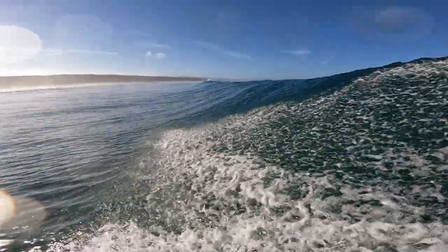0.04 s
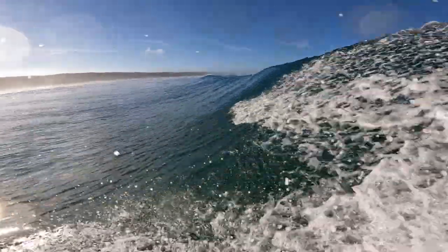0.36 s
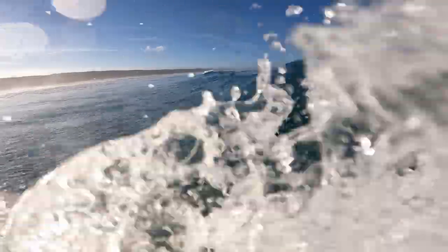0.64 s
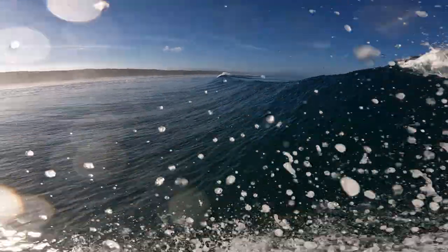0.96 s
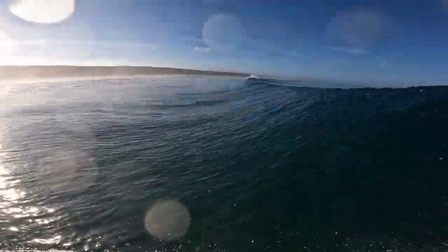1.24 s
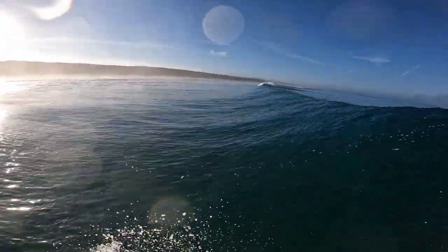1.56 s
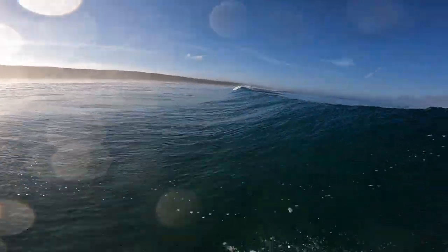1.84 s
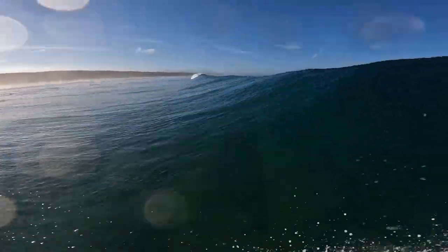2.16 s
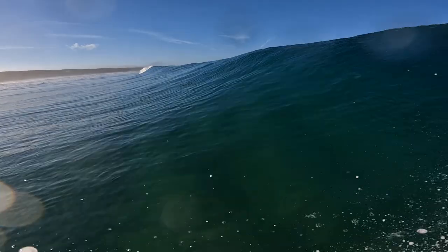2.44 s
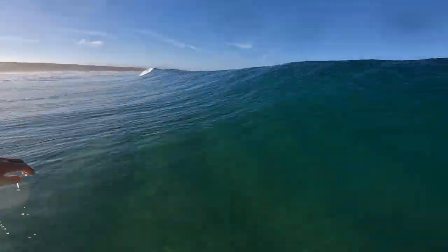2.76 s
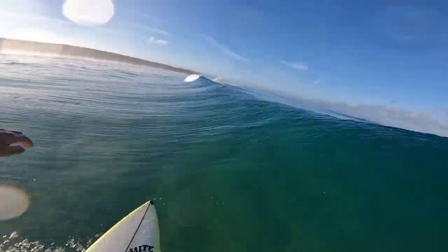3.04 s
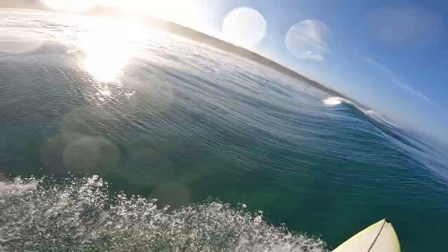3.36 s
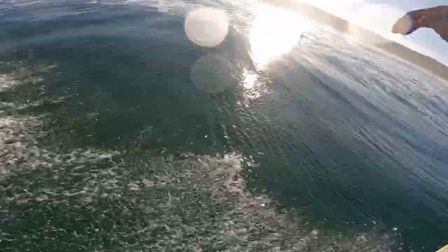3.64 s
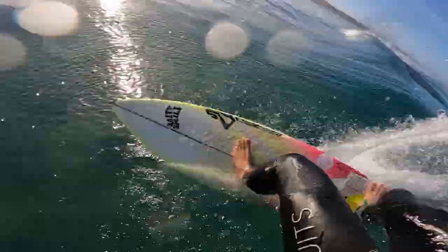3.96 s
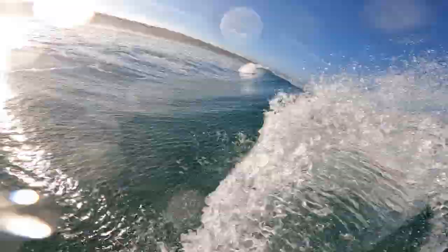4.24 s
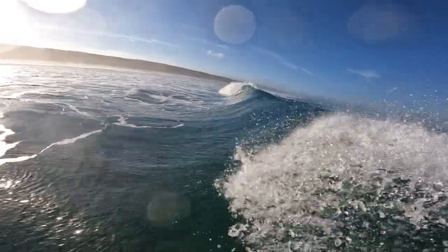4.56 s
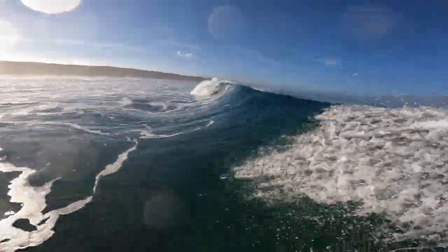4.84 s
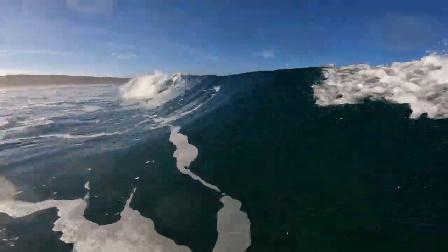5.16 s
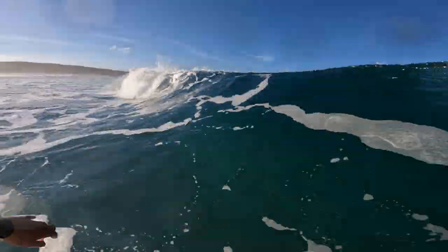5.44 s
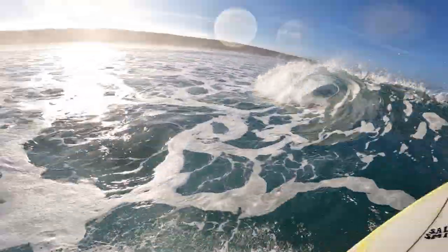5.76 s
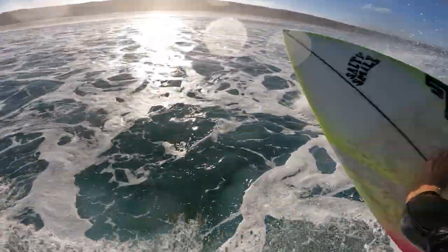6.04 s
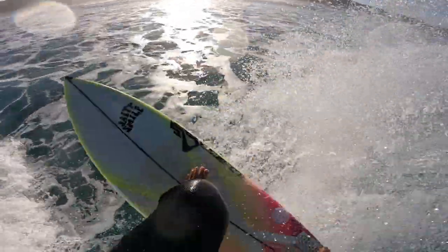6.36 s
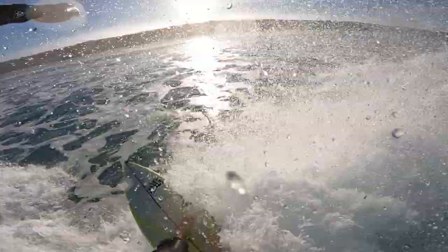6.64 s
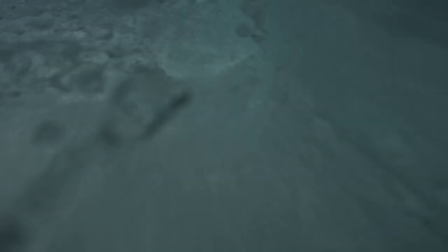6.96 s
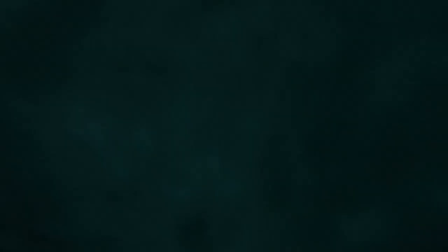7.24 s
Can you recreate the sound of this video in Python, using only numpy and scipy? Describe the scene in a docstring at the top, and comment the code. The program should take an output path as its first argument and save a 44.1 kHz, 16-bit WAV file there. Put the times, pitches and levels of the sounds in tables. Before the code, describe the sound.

A continuous close roar of churning water and buffeting wind comes through the sealed housing of a camera riding an ocean wave. Spray fizzes on and off, splashes tap and knock against the case, and water momentarily muffles the microphone about halfway through. The ride ends in a hollow slap of foam, followed by the deep glugs and bubbling crackle of going underwater.

```python
"""A surfer rides a wave with a waterproof camera. From the start, turbulent wind buffets the housing and
excites the cavities of its microphone port, while water churns under the board and spray hisses.
From half a second on, drops strike the housing; later, films of water briefly seal the port.
Near seven seconds white water slaps the housing with a hollow, comb-like ring, and the camera plunges
under, into the gulps of large air pockets and the crackle of small bubbles."""
import sys
import numpy as np
from scipy.fft import rfft, irfft, next_fast_len
from scipy.io import wavfile
from scipy.ndimage import map_coordinates

SR = 44100
rng = np.random.default_rng(int(sys.argv[2]) if len(sys.argv) > 2 else 0)


def wav_record(signal):
    """Record a signal, one row per channel, as 16-bit PCM in the file named by sys.argv[1]."""
    frames = np.transpose(np.atleast_2d(signal))
    bounded = np.clip(frames, -1, 1)
    # unit amplitude maps onto the largest positive 16-bit level
    quanta = np.round(bounded * 32767).astype(np.int16)
    wavfile.write(sys.argv[1], SR, quanta)


N = 330750

# speed of the air over the port, expressed as a level: (time [s], relative level [dB])
AIRFLOW = [(0, -42.5), (.32, -41), (.42, -39), (.55, -39.5), (.64, -44), (.96, -44), (1.04, -39),
           (1.2, -42.5), (1.5, -45), (1.8, -42), (2.05, -42.5), (2.35, -41.5), (2.5, -42), (2.63, -38),
           (2.77, -46.5), (2.9, -40.5), (3.03, -43), (3.25, -50.5), (3.46, -58.5), (3.58, -52.5),
           (3.8, -46), (4.2, -49), (4.32, -39), (4.38, -46.5), (4.44, -43), (4.49, -45.5), (4.58, -40.5),
           (4.8, -43.5), (5.3, -40.5), (5.55, -46), (5.76, -41), (5.9, -54), (6.05, -48), (6.33, -52),
           (6.52, -52), (6.85, -49), (7.5, -46)]
# surges and lulls of pressure on the housing: (time [s], length [s], change [dB])
SURGES = [(.54, 0.051, 5), (.75, .25, 0), (1.68, 0.059, 1.5), (2.2, .2, 1), (2.9, 0.057, 4), (3.6, .2, 0),
          (3.87, 0.11, -4.5), (4.15, 0.2, 3.5), (4.72, .26, -1.5), (5.6, .12, 3), (6.1, 0.36, -3),
          (6.9, 0.26, 3), (7.09, 0.11, 3), (7.27, 0.07, -5.5)]
# air cavities of the port: (frequency [Hz], bandwidth [Hz], gain [dB])
PORT_MODES = [(660.7, 160, 3), (674, 110, -7)]
# the port's pitch, which sinks as it gets wet: (time [s], frequency [Hz])
PORT_PITCH = [(0, 668), (.5, 652), (.69, 527.4), (.8, 703.4), (1.15, 664), (1.4, 509.4), (1.85, 628.4),
              (2.3, 676), (2.9, 624), (3.4, 520), (3.9, 623), (4.4, 594), (4.65, 688.7), (5.35, 649.2),
              (6, 541.7), (7.5, 556.2)]
# gusts that catch the port squarely: (time [s], length [s], rise [dB])
HOWLS = [(.1, 0.32, 3), (.81, 0.1, 5), (.97, .12, 2), (1.17, 0.14, 5.5), (1.45, 0.31, 7.5), (1.85, .2, 2.5),
         (2.25, 0.57, 5.5), (3.28, .2, 1.5), (4.68, .25, 5), (5.38, .2, 2.5), (6.2, .2, 4.5),
         (6.66, .1, 12), (6.92, 0.071, 12), (7.1, 0.055, 11)]
# how hard the board and the white water churn: (time [s], level [dB])
CHURN_LEVEL = [(0, -26), (.2, -30.5), (.5, -27), (1.1, -31), (1.5, -28), (1.95, -31), (2.45, -33),
               (2.72, -25.5), (2.95, -29.5), (3.3, -27), (3.5, -29), (3.9, -25), (4.2, -27.5), (4.5, -25),
               (4.62, -31.5), (5.2, -33), (5.52, -25.5), (5.72, -29), (5.95, -25.5), (6.15, -25.5),
               (6.3, -23.5), (6.47, -24), (6.6, -23), (6.84, -25), (6.95, -23), (7.5, -28)]
# spray and foam beside the board: (time [s], level [dB])
SPRAY_LEVEL = [(.25, -73), (.53, -64), (.63, -75), (.8, -71.5), (.98, -71), (1.03, -59.5), (1.12, -64.5),
               (1.45, -75.5), (1.8, -69), (2.5, -68), (2.78, -81.5), (3.28, -77), (3.55, -66.5),
               (3.92, -65.5), (4.2, -72.5), (4.33, -74), (4.5, -68.5), (4.88, -61), (5.3, -64.5),
               (5.7, -73.5), (6.05, -68), (6.32, -73), (6.45, -67), (6.53, -71), (6.61, -66), (6.8, -70),
               (7.3, -72)]
# sheets of fine droplets that sweep the housing; the two brief rows near 6.9 s are bright cracks of the
# plunge's impacts: (time [s], length [s], level [dB])
SHEETS = [(0.295, 0.84, -80.5), (0.786, 0.05, -68.5), (1.037, 0.08, -63.5), (2.252, 0.8, -76),
          (2.618, 0.077, -73.5), (3.097, 0.44, -79.5), (3.528, 0.16, -69), (3.696, 0.27, -73.5),
          (4.109, .05, -68), (5.998, 0.57, -72.5), (6.48, 0.12, -76), (6.71, 0.04, -66), (6.9, 0.042, -49),
          (6.933, 0.0095, -43.5), (7.095, 0.06, -67)]
# lumps of water and bubbles striking the housing:
# (time [s], knock pitch [Hz], knock level [dB], tick pitch [Hz], tick level [dB], crack level [dB])
DROPS = [(.5370, 1160, -27, 1900, -43, -53), (0.7594, 850, -32, 2150, -35.5, -43),
         (.7855, 714, -22, 2200, -42.5, -53.5), (0.8602, 1020, -21, 1850, -35, -60),
         (1.023, 910, -27, 1900, -38, -56), (1.385, 929.8, -24.5, 1808, -48, -61),
         (3.9600, 950, -19, 3400, -34.5, -44), (3.9618, 447, -19, 1400, -36, -60),
         (4.0410, 900, -26, 3270, -47, -57), (4.1210, 596, -13, 2960, -34.5, -45),
         (4.1240, 700, -20.5, 1500, -38.5, -60), (4.1935, 684.3, -16, 1650, -37.5, -66),
         (6.587, 744, -28, 2120, -50.5, -64.5), (6.7030, 1095, -23, 2300, -48, -53),
         (6.7900, 1100, -30, 1903, -50, -65), (6.8470, 1100, -30, 2000, -46, -57),
         (6.8590, 995, -23, 2100, -43, -52), (6.8752, 1050, -31, 2100, -42, -52),
         (6.8928, 940, -18, 3196, -33, -35.5), (6.8975, 1350, -27, 2600, -28, -24.5),
         (6.9010, 950, -15.5, 1700, -24.5, -39.5), (6.9081, 450, -17, 1500, -42, -58),
         (6.9168, 1000, -21, 1850, -34, -40), (6.9297, 1250, -23, 3300, -33, -35),
         (6.9320, 905, -25, 2000, -34, -39), (6.9355, 560, -21, 2500, -36, -43),
         (6.9435, 519, -18, 2450, -41, -52), (6.9770, 470, -15.5, 2700, -49, -51),
         (7.0057, 650, -17.5, 2300, -49, -53), (7.0135, 900, -30, 2600, -52, -54),
         (7.0210, 750, -25, 2000, -48, -57), (7.041, 800, -27, 3300, -61, -55),
         (7.1, 790, -29, 2600, -51, -54), (7.1060, 614, -24, 2000, -42, -47),
         (7.1160, 600.6, -22, 1903, -42, -48.5), (7.1250, 800, -25, 2800, -48, -44.5),
         (7.1288, 990, -20.5, 2200, -43, -43), (7.1490, 900, -34, 2700, -52, -51.5),
         (7.1650, 850, -33.5, 2400, -50.5, -55), (7.1740, 750, -31, 2378, -52.5, -52),
         (7.1796, 535, -17, 2400, -56, -54), (7.3260, 1000, -28.5, 2500, -45.5, -49),
         (7.339, 1201, -31, 2004, -45, -51), (7.3550, 1295, -36, 2990, -52, -48),
         (7.3690, 1000, -34, 2480, -51, -54), (7.3820, 950, -38, 2200, -46, -53),
         (7.4050, 1100, -32, 2400, -43, -48), (7.4190, 1000, -28, 2703, -46, -51),
         (7.4330, 1040, -25, 2100, -40, -49), (7.4420, 980, -27, 3000, -49, -52.5),
         (7.4560, 1200, -32, 2200, -42, -49), (7.4797, 1210, -37, 2600, -49, -54.5)]
# tiny beads of spray landing on the port: (time [s], level [dB])
BEADS = [(0.7768, -63), (0.8092, -66.5), (0.991, -66), (1.9731, -71), (2.3003, -70), (3.6237, -69.5),
         (4.236, -73), (4.3240, -68), (5.8940, -70.5), (6.6925, -66.5), (7.0790, -64)]
# large air pockets collapsing near the camera: (time [s], length [s], pitch [Hz], level [dB])
GULPS = [(.792, .03, 725, -27.5), (.822, .026, 665, -25.5), (6.897, 0.061, 54.2, -23.5),
         (6.903, 0.052, 228, -24), (6.94, 0.022, 127, -20.5), (6.979, .05, 292.7, -27),
         (7.052, .03, 163.4, -23.5), (7.096, 0.054, 77.2, -20.5), (7.102, 0.043, 221, -26),
         (7.112, .035, 510, -24.5), (7.171, 0.055, 109.1, -20.5)]
# water films over the port: (time [s], length [s], treble loss [dB], bass loss [dB])
FILMS = [(2.777, 0.031, 6, 1), (4.001, 0.065, 13, 6.5), (4.159, 0.03, 9, 1.5), (4.214, 0.021, 2.5, 4),
         (7.152, 0.028, 7.5, 13.5), (7.244, 0.12, 9.5, -1)]
# foam clouds bursting on the housing: (time [s], hold [s], relative level [dB])
FOAM_CLOUDS = [(6.702, 0.014, -53), (6.847, 0.031, -47), (6.89, 0.039, -42), (6.972, .02, -56),
               (7.003, 0.018, -56), (7.06, 0.035, -61), (7.108, 0.027, -48), (7.334, 0.08, -51.5),
               (7.403, 0.044, -48), (7.492, .02, -47)]
# white water slaps the housing with a hollow, comb-like ring:
# (time [s], length [s], lowest peak [Hz], level [dB], relative port ring [dB])
SLAPS = [(6.888, 0.032, 1140, -33, -16), (6.945, 0.029, 1470, -36.5, -18)]
# evenly spaced peaks in a slap's hollow ring, lowest first: (relative level [dB])
HOLLOW_PEAK_DB = [4.5, -6, -30, -24.5, -29, -33]

# noise spectra: (frequency [Hz], relative spectral density [dB])
BUFFET_SPECTRUM = [(10, -10.5), (25, -1.5), (50, -2.5), (80, 0.5), (105, -4.5), (140, -2.5), (190, -15.5),
                   (400, -42), (900, -91)]  # eddies on the housing
RUSH_SPECTRUM = [(150, -12.5), (350, 2), (550, 9), (840, 4.5), (950, -1), (1110, -0.5), (1400, -10.5),
                 (1800, -19), (2300, -28), (2700, -34), (3500, -42.5), (5000, -57), (9000, -92)]  # air over the port
CHURN_SPECTRUM = [(60, -24), (130, -4.5), (180, 0.5), (300, 0.5), (460, -1.5), (600, -9), (800, -14.5),
                  (1100, -37), (2000, -63), (5000, -100)]  # water under the board
HISS_SPECTRUM = [(600, -17.5), (1500, 7.5), (2300, 10.5), (2680, 0.5), (2950, 8), (3450, -0.5), (4100, -10),
                 (5200, -14), (6500, -26), (8000, -32), (11000, -59.5)]  # spray and foam
MIST_SPECTRUM = [(800, -18.5), (1800, 4.5), (3500, 0.5), (4300, -4.5), (5500, -6.5), (6500, -13),
                 (7500, -20.5), (10000, -50)]  # fine droplets
CRACK_SPECTRUM = [(500, -5.5), (2000, 8), (3600, -5), (4600, -11), (6000, -19), (8000, -29), (11000, -41)]  # a wet impact
BEAD_SPECTRUM = [(1500, -6), (3500, 0.5), (5800, 0), (7500, -9), (11000, -15.5)]  # a bead's tick


def amp(db):
    """Amplitude ratio of a level in decibels."""
    return 10 ** (np.asarray(db) / 20)


def unit(x):
    """Normalisation to rms 1."""
    return x / np.sqrt(np.mean(x ** 2) + 1e-20)


def curve(rows):
    """Linear interpolation of (time [s], value) points at every sample."""
    return np.interp(np.arange(N) / SR, *np.transpose(rows))


def wobble(rate):
    """Smooth random modulation with rate knots a second."""
    knots = rng.standard_normal(int(N * rate / SR) + 4)
    return map_coordinates(knots, [np.arange(N) * rate / SR])


def swells(rows):
    """Superposed Gaussian envelopes from (time [s], length [s], height)."""
    t = np.arange(N) / SR
    return sum(height * np.exp(-(2 * (t - s) / length) ** 2) for s, length, height in rows)


def plateau(s, length):
    """A flat-topped window centred on time s."""
    offset = 2 * (np.arange(N) / SR - s) / length
    return 1 / (1 + offset ** 8)


def filtered(x, response):
    """Linear filtering: the spectrum of x times a frequency response."""
    size = next_fast_len(N + SR // 2)
    return irfft(rfft(x, size) * response(np.fft.rfftfreq(size, 1 / SR)), size)[:N]


def lowpass(x, cutoff_hz, order):
    """Zero-phase attenuation above the cutoff."""
    return filtered(x, lambda hz: 1 / (1 + (hz / cutoff_hz) ** order))


def noise(spectrum):
    """Noise of rms 1, shaped by a spectrum interpolated in log frequency."""
    f, db = np.transpose(spectrum)
    colour = lambda hz: amp(np.interp(np.log(hz + 1), np.log(f), db))
    return unit(filtered(rng.standard_normal(N), colour))


def bubbles(start, rate, centre_hz, octaves, cycles, scatter_db, slope_db, rise):
    """Bubbles as damped oscillators, rms 1 from start on: small ones ring higher, shorter and weaker."""
    draws = rng.random((int(rate * (N / SR - start)), 4))
    when, pitch, strength, life = draws.T[:, :, None]
    octave = octaves * (2 * pitch - 1)
    hz = centre_hz * 2 ** octave
    t = np.arange(min(int(3 * cycles / centre_hz * SR), 1500)) / SR
    age = hz * t / (cycles * (.5 + life))  # 1 after 60 dB of decay
    ring = np.sin(2 * np.pi * hz * t * (1 + rise * age))
    envelope = amp(-60 * age) * (1 - np.exp(-2 * hz * t)) * (1 - t / t[-1])
    grains = ring * envelope * amp(-scatter_db * np.log(strength + 0.01) + slope_db * octave)
    index = (start * SR + when * (N - start * SR)).astype(int) + np.arange(len(t))
    cloud = np.bincount(index.ravel(), grains.ravel(), N)[:N]
    return cloud / np.std(cloud[int(start * SR):])


def wind_buffet(air_db):
    """Eddies exert a fluctuating pressure on the housing, heard as a rumble."""
    gust_db = air_db - air_db.mean()
    return amp(-28 + .05 * gust_db + swells(SURGES)) * noise(BUFFET_SPECTRUM)


def wind_rush(air_db):
    """Turbulent flow over the port makes broadband noise that grows with air speed."""
    flutter_db = 1.2 * wobble(25) + 1.8 * wobble(130)
    return amp(air_db + 9 + flutter_db) * noise(RUSH_SPECTRUM)


def port_song(air_db, churn_db):
    """Cavity resonance: the port sings louder in fast air and is choked by churning water."""
    def response(f):
        modes = sum(amp(db) * 1j * f * width / (hz * hz - f * f + 1j * f * width)
                    for hz, width, db in PORT_MODES)
        return modes / (1 + (f / 860) ** 16) * f ** 2 / (f ** 2 + 350 ** 2)

    song = filtered(rng.standard_normal(N), response)
    # resampling makes both cavities glide and flutter together
    pitch_ratio = curve(PORT_PITCH) / PORT_MODES[0][0] * (1 + 0.01004 * wobble(9))
    song = unit(map_coordinates(song, [np.cumsum(pitch_ratio)], order=3, mode="mirror"))
    gust_db, wet_db = air_db - air_db.mean(), churn_db - churn_db.mean()
    song_db = -38.5 + 0.31 * gust_db - 0.25 * wet_db + swells(HOWLS) + 0.55 * wobble(15)
    return amp(song_db) * song


def churn(churn_db):
    """Turbulence under the board roars, and the large air pockets it entrains oscillate as gurgles."""
    gurgle = bubbles(0, rate=260, centre_hz=287.4, octaves=0.89, cycles=12,
                     scatter_db=1.5, slope_db=-2, rise=0.11)
    return amp(churn_db) * (amp(-2) * noise(CHURN_SPECTRUM) + amp(-6.5) * gurgle)


def spray():
    """Many tiny bubbles and droplets add incoherently into a hiss of foam and a fine mist."""
    fizz = bubbles(0, rate=2600, centre_hz=2960, octaves=0.63, cycles=4.5,
                   scatter_db=8, slope_db=-11.5, rise=.05)
    specks = bubbles(0, rate=700, centre_hz=4600, octaves=0.7, cycles=4,
                     scatter_db=6, slope_db=-9.5, rise=.03)
    mist = amp(-1) * noise(MIST_SPECTRUM) + amp(-12.5) * specks
    hiss = noise(HISS_SPECTRUM) + amp(-6.5) * fizz
    sheets = swells([(s, length, amp(db)) for s, length, db in SHEETS])
    mist_gain = np.hypot(sheets, amp(-80.5))  # passing sheets and steady mist add in power
    return amp(curve(SPRAY_LEVEL)) * hiss + mist_gain * mist


def patter(air_db):
    """Stray drops carried by the air stream ring briefly on impact, louder in faster air."""
    plops = bubbles(0, rate=70, centre_hz=1060, octaves=0.82, cycles=7.1,
                    scatter_db=-1, slope_db=-12.5, rise=0.044)
    return amp(air_db - 10) * lowpass(plops, 2200, order=6)


def drops():
    """Heavily damped impacts: each lump of water knocks on the wet wall, ticks on the port and cracks."""
    out, t = np.zeros(N + SR), np.arange(SR // 50) / SR
    pulse = lambda peak_s: (t / peak_s) ** 2 * np.exp(2 - 2 * t / peak_s)
    grit = noise(CRACK_SPECTRUM)
    for s, knock_hz, knock_db, tick_hz, tick_db, crack_db in DROPS:
        start = round(s * SR)
        knock = amp(knock_db) * pulse(0.00095) * np.sin(2 * np.pi * knock_hz * t)
        tick = amp(tick_db) * pulse(0.00069) * np.sin(2 * np.pi * tick_hz * t)
        crack = amp(crack_db) * pulse(0.0009) * grit[start:][:len(t)]
        out[start:][:len(t)] += knock + tick + crack
    return out[:N]


def beads(peak_s=.0008):
    """A brief impact has a broad spectrum: beads of spray land on the port with a thin, faint tick."""
    t = np.arange(N) / SR
    ages = [(np.clip((t - s) / peak_s, 0, 20), db) for s, db in BEADS]
    envelope = sum(amp(db) * age * np.exp(1 - age) for age, db in ages)
    return envelope * noise(BEAD_SPECTRUM)


def gulps(rise_octaves_per_s=2):
    """A large air pocket pulsates at its natural frequency, which rises as the pocket shrinks."""
    out = np.zeros(N)
    for s, length, hz, db in GULPS:
        t = np.arange(-int(2 * length * SR), int(2 * length * SR)) / SR
        pitch_hz = hz * 2 ** (rise_octaves_per_s * t)
        phase = 2 * np.pi * (np.cumsum(pitch_hz) / SR + rng.random())
        envelope = amp(db) * np.exp(-(2 * t / length) ** 2)
        out[round((s + t[0]) * SR):][:len(t)] += envelope * np.sin(phase)
    return out


def water_films(x):
    """Transmission loss: a film of water briefly seals the port, changing bass and treble unequally."""
    treble_loss_db, bass_loss_db = sum(np.outer(loss_db, plateau(s, length))
                                       for s, length, *loss_db in FILMS)
    bass = lowpass(x, 650, order=6)
    return amp(-bass_loss_db) * bass + amp(-treble_loss_db) * (x - bass)


def foam(rise_db_per_s=1498.5, fall_db_per_s=702.5):
    """Bubble resonance: as white water closes over the camera, clouds of foam swell, crackle and die."""
    t = np.arange(N) / SR
    envelope = np.zeros(N)
    for s, hold, db in FOAM_CLOUDS:
        before_s, after_s = np.clip(s - t, 0, .1), np.clip(t - s - hold, 0, .1)
        envelope += amp(db - rise_db_per_s * before_s - fall_db_per_s * after_s)
    crackle = bubbles(6.6, rate=1200, centre_hz=1920, octaves=1.65, cycles=3.7,
                      scatter_db=4, slope_db=-15.5, rise=.1)
    fizz = bubbles(7.4, rate=2400, centre_hz=3300, octaves=0.99, cycles=4,
                   scatter_db=0, slope_db=-12.5, rise=.05)
    return envelope * lowpass(amp(11) * crackle + amp(-10.5) * fizz, 6800, order=8)


def slaps(peak_step_hz=1010, peak_width_hz=270, port_ring_hz=3450, sag_octaves_per_s=1.7):
    """Comb-like colouration: each slap has a brief hollow ring of evenly spaced peaks that sag in pitch."""
    out, t = np.zeros(N), np.arange(N) / SR
    notch = lambda f: np.abs(f - 2130) / np.hypot(f - 2130, 400)  # a gap in the ring's spectrum
    peak = lambda detune_hz: 1 / (1 + (2 * detune_hz / peak_width_hz) ** 2) ** 2
    for s, length, lowest_hz, db, ring_db in SLAPS:
        peaks = [(lowest_hz + k * peak_step_hz, level) for k, level in enumerate(HOLLOW_PEAK_DB)]
        peaks.append((port_ring_hz, ring_db))
        hollow = lambda f: notch(f) * sum(amp(level) * peak(f - hz) for hz, level in peaks)
        steady = filtered(rng.standard_normal(N), hollow)
        pitch_ratio = 2 ** (-sag_octaves_per_s * np.clip(t - s, -length, length))
        ring = np.interp(np.cumsum(pitch_ratio) % N, np.arange(N), steady)
        out += amp(db) * plateau(s, length) * unit(ring)
    return out


def scene():
    """Superposition in mono: the continuous sounds pass through the water films; the brief ones add on."""
    air_db, churn_db = curve(AIRFLOW), curve(CHURN_LEVEL)
    wind = wind_buffet(air_db) + wind_rush(air_db) + port_song(air_db, churn_db)
    ride = water_films(wind + churn(churn_db) + spray() + patter(air_db))
    return (ride + foam() + gulps() + slaps() + drops() + beads())[None]


def record(dry):
    """Low-pass filtering: the sealed housing dulls the treble, and the camera limits the bandwidth."""
    housing_hz, limit_hz = 9200, 11100
    edge_s = np.minimum(np.arange(N), np.arange(N)[::-1]) / SR
    fade = np.minimum(edge_s / .001, 1)
    response = lambda hz: (hz < limit_hz) / np.sqrt(1 + (hz / housing_hz) ** 10)
    return filtered(dry[0] * fade, response)[None]


dry = scene()
out = record(dry)
wav_record(out)
```